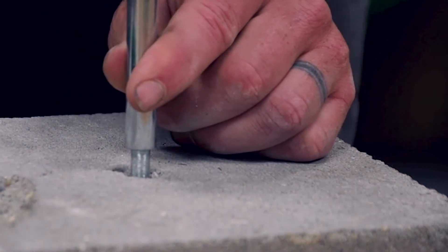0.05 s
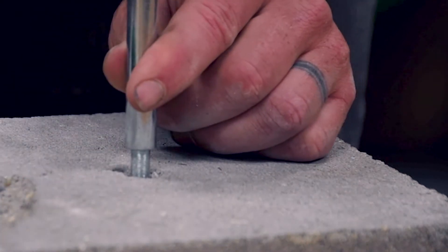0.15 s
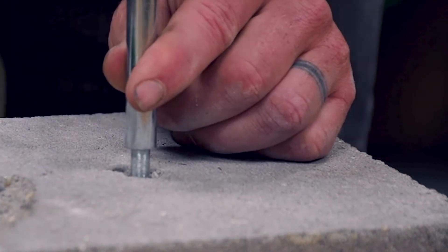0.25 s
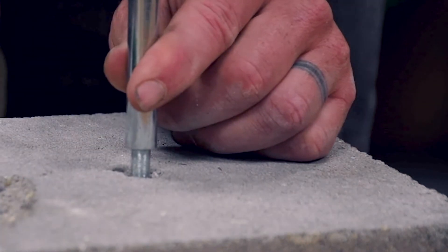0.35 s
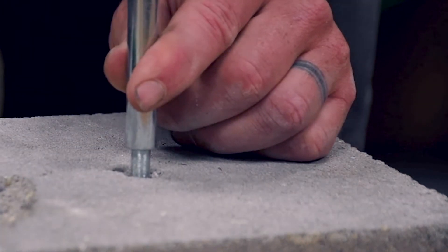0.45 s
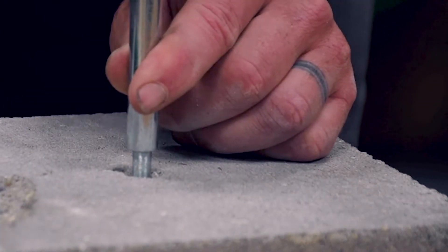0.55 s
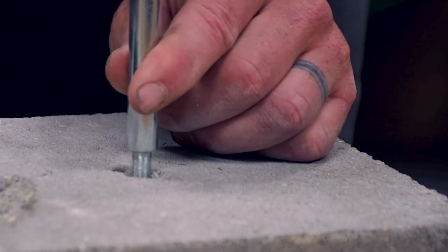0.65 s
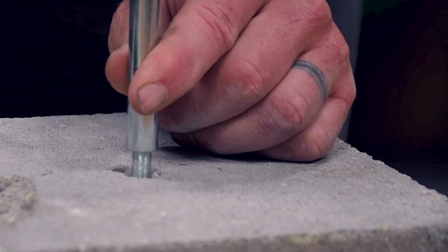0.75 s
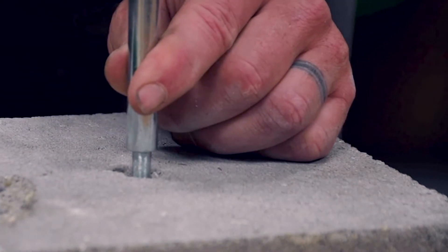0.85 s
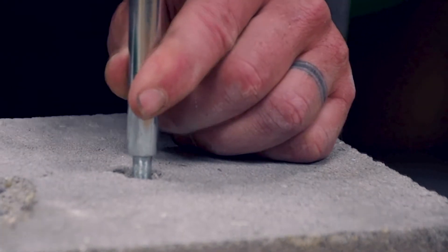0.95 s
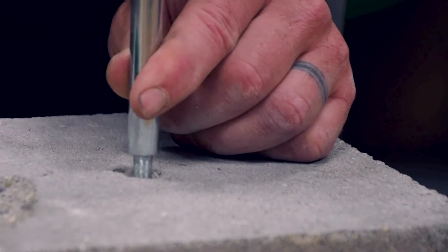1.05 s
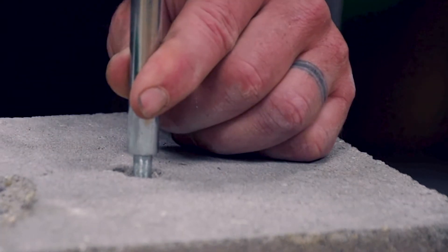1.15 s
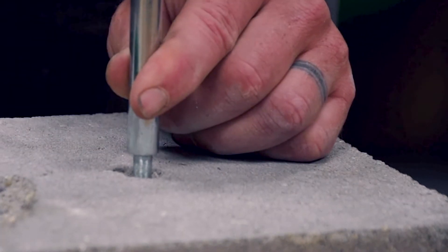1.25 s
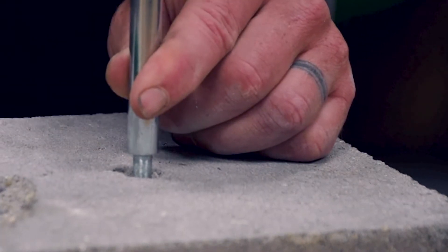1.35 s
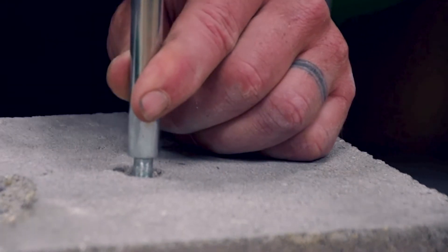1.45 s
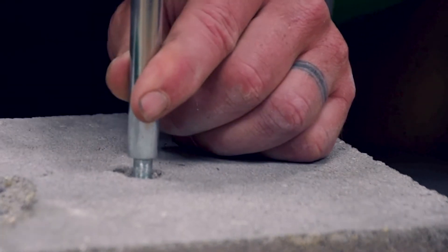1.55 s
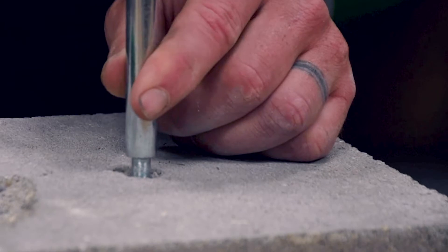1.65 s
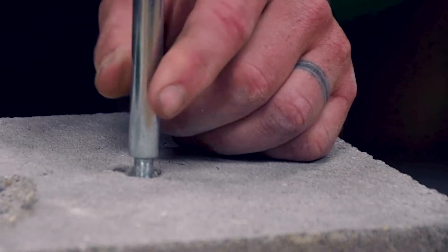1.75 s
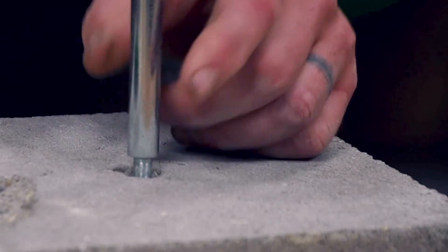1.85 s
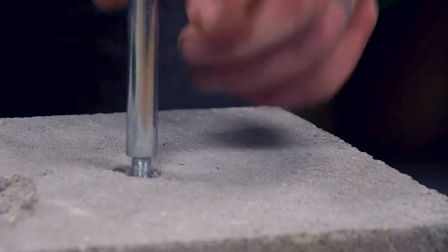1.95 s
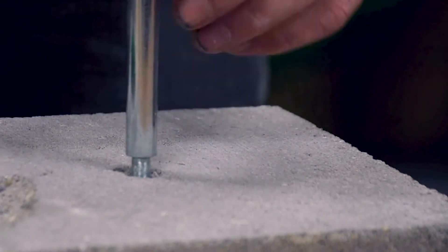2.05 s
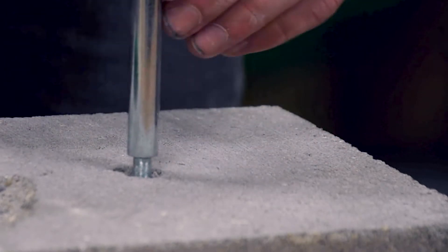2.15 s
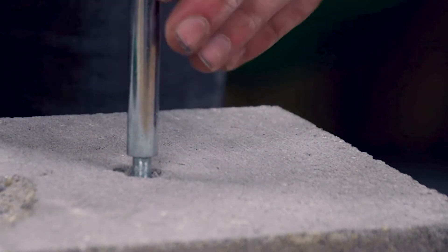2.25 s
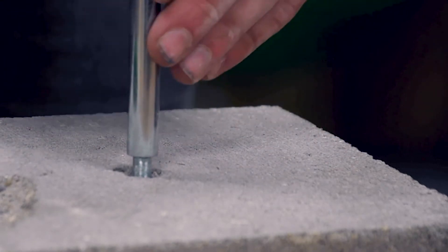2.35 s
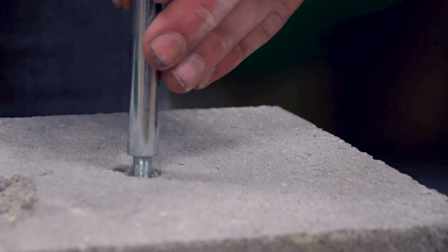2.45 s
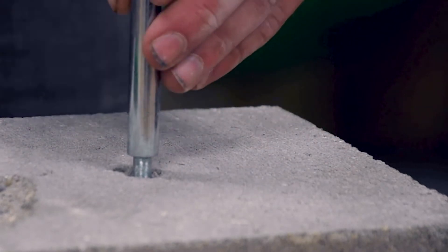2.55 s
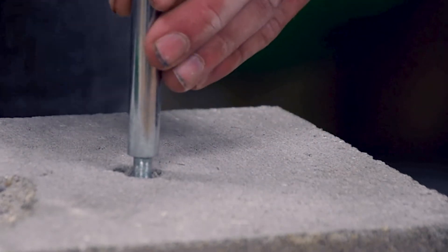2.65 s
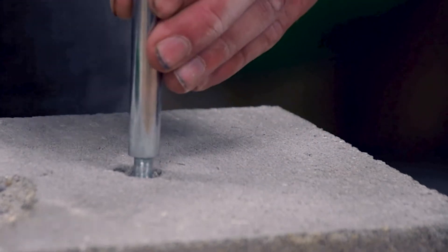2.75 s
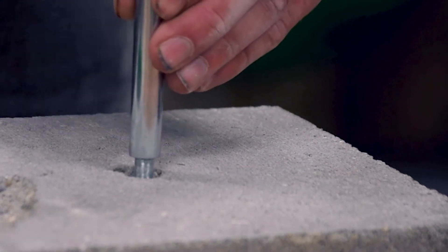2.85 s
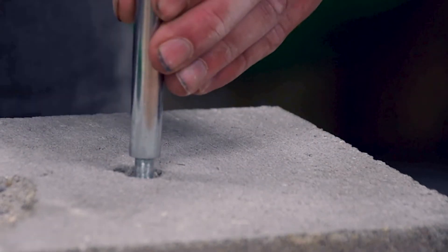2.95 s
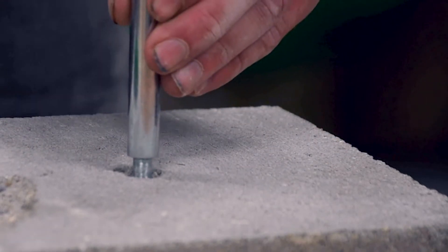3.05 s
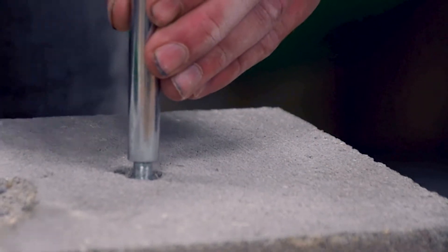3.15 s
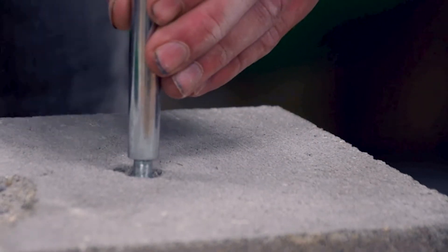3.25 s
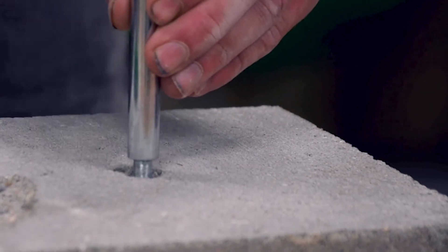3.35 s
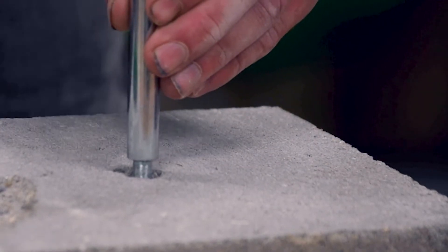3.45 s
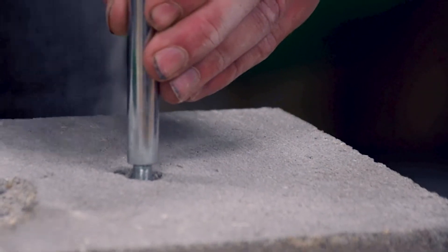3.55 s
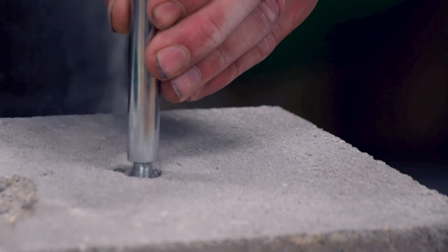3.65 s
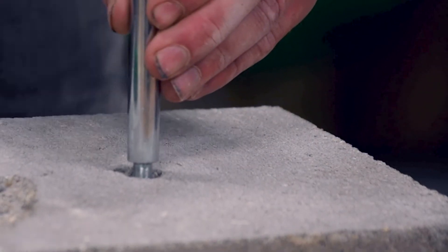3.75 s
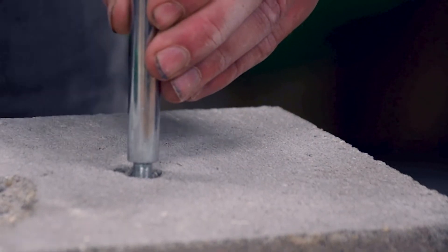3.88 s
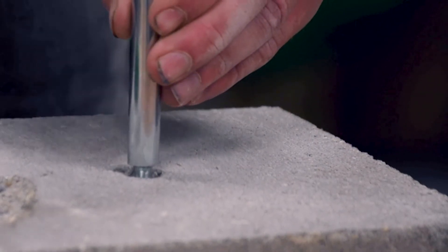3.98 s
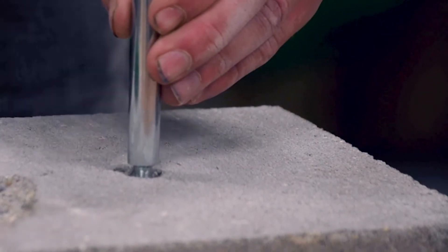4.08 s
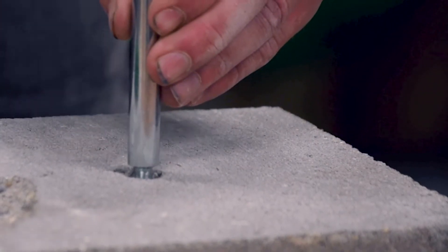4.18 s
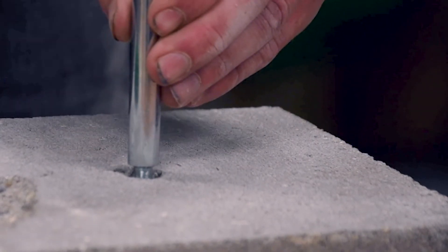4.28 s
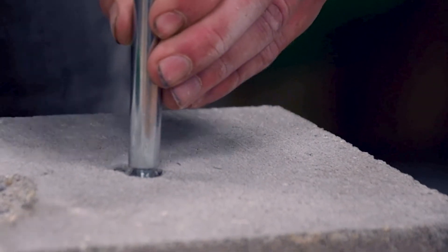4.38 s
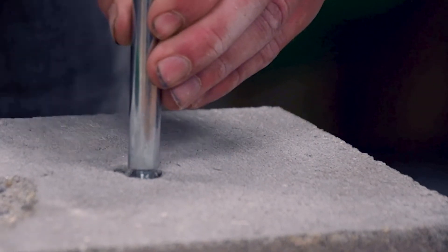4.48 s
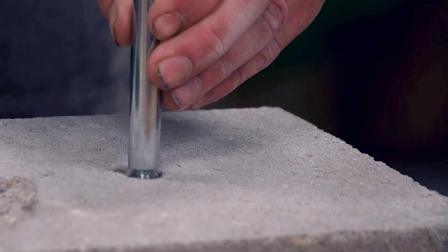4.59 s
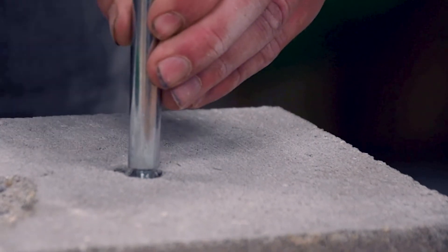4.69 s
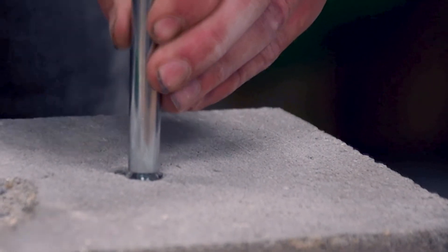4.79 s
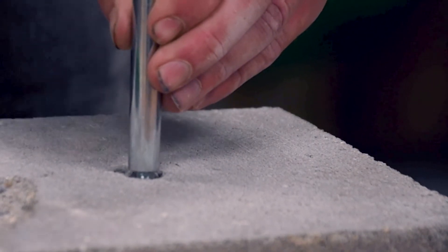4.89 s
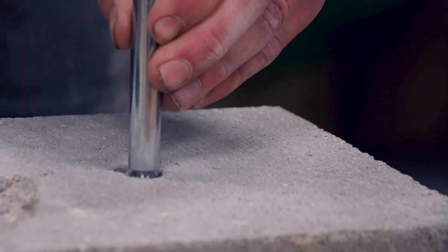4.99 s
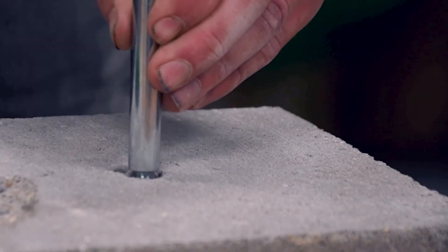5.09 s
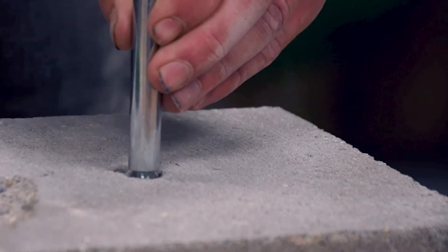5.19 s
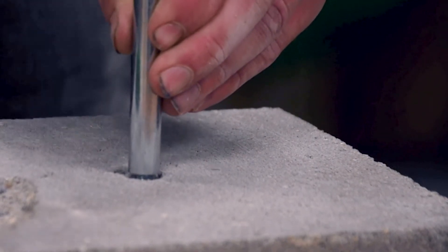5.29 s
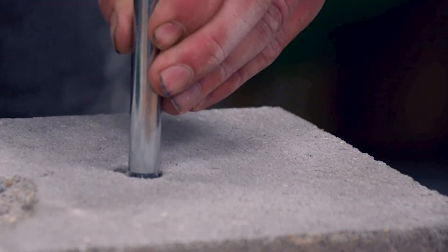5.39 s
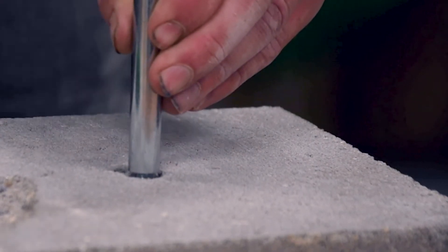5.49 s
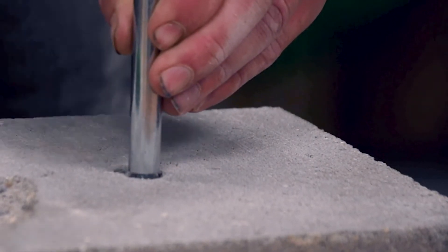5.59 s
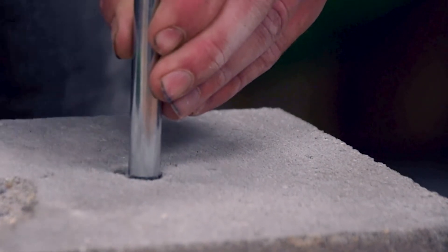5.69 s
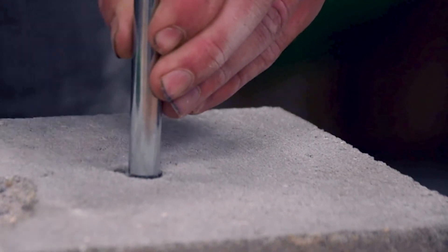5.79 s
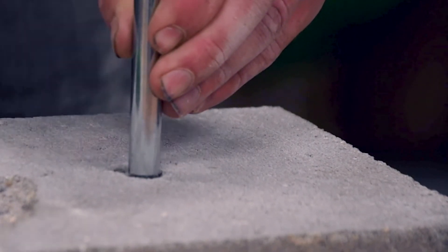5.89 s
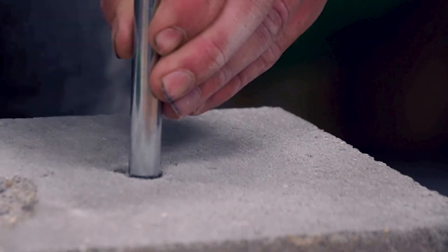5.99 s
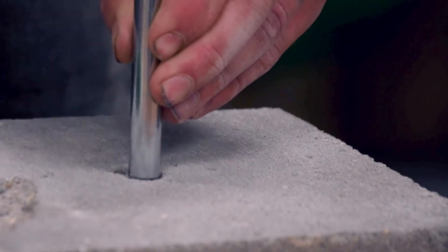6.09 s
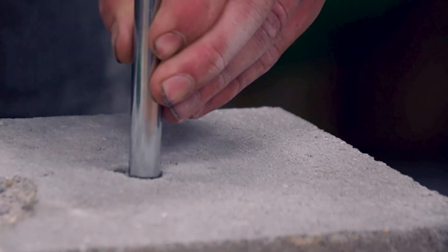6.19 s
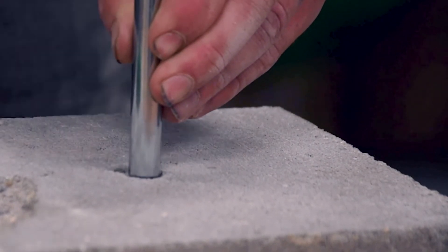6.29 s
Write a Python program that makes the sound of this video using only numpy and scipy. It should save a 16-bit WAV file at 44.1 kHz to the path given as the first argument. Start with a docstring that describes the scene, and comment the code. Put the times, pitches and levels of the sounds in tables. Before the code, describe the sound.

Close stereo pickup in a live workshop: a hammer hits a hand-held steel tool three times, bright clank with a slightly muffled ring. The hand shifts its grip with faint skin rubs and a small tick, then nine more blows follow at about 0.4-second spacing, ringing clearer and thudding heavier as the anchor tightens in the concrete. Short room boom swells behind each hit; a low drone underlies everything.

```python
"""In a live workshop, a hammer drives an anchor into a concrete block through a hand-held steel setting tool.
Three blows, a new grip, then nine more; between them skin rubs and ticks against the tool, over a low drone.
Each blow is a contact spectrum (steel crack, tool modes, block thud) made causal and convolved with the room.
The thud grows and brightens as the anchor tightens; a loosely held tool sings on after the blow.
A fast limiter flattens every blow, so the boom of the room swells up behind the ring."""
import sys
import numpy as np
from scipy import signal
from scipy.fft import rfft, irfft, next_fast_len
from scipy.io import wavfile
from scipy.ndimage import uniform_filter1d, minimum_filter1d

SR = 44100
rng = np.random.default_rng(int(sys.argv[2]) if len(sys.argv) > 2 else 0)


def master(y):
    """Save y as 16-bit WAV."""
    cut = np.clip(np.atleast_2d(y).T, -1, 1)
    pcm = np.round(cut * 32767)  # scale
    wavfile.write(sys.argv[1], SR, pcm.astype(np.int16))


N = 279094

# Hammer blows. Each row: start in seconds, force in dB, bending of the shaft in dB, share of the bending
# in the lower twin mode (0-1), glancing (0-1), upper edge of the blow's treble in Hz.
HAMMER_BLOWS = [(0.5459, -4.5, -6.5, 0.1, 0.37, 12200), (0.9896, -2.5, 2, 0.27, 0.23, 14500),
                (1.4295, 0, 3, .15, 0.23, 14800), (2.7552, -4.5, 3, 0, 0.92, 10400),
                (3.1823, -1.5, -5.5, 0.06, 0.26, 14500), (3.5807, -1.5, 1.5, 1, 0.06, 16000),
                (3.9954, -1.5, 5.5, 0.86, 0.11, 16500), (4.3777, -1.5, -1, 0.55, 0.53, 15000),
                (4.825, -1.5, 0.5, 0.17, 0, 14700), (5.243, -0.9, 0, 0.25, 0.45, 15100),
                (5.6443, -0.5, -0.2, 0.25, 0.4, 15000), (6.0465, -1, -1, 0.14, 0.15, 15900)]
# Main modes of steel tool and hammer head, damped by the hand. Each row: frequency in Hz, half width in Hz.
TOOL_MODES = [(2966, 157), (5068, 99), (5362, 78), (6662, 90), (7960, 370), (8466, 383), (9601, 400),
              (11660, 410)]
# How strongly each main mode speaks. Each row: level in dB while the anchor slides, level in dB once it is
# seated, dB added by a fully glancing blow.
MODE_LEVELS = [(4.5, -8, -1.5), (13.5, 20.5, 1.5), (10, 21.5, 4), (-0.5, 4.5, 19), (16, -10, -14),
               (12, 10.5, -4.5), (0, -0.5, 9.5), (1, -4, 2.5)]
# Rows of TOOL_MODES that are one bending shape in two planes: the lower, the upper.
TWIN_MODES = [1, 2]
# Weak modes, alike in every blow. Each row: frequency in Hz, half width in Hz, level in dB.
WEAK_MODES = [(1880, 110, -4), (3480, 80, -2), (4130, 150, -2), (6050, 300, 1), (12180, 55, 0),
              (13730, 40, -4), (14560, 80, -13)]
# Crack of steel on steel. Each row: frequency in Hz, level in dB.
CRACK_SPECTRUM = [(30, -38), (200, -10.5), (1500, -7.5), (2300, -7.5), (4500, 1.5), (7000, 0), (9500, -5.5),
                  (10500, -7.5), (13000, -3), (15500, -10.5)]
# Thud of the block on its bench. Each row: frequency in Hz, level in dB.
THUD_SPECTRUM = [(20, -19), (50, -18), (85, -13.5), (120, -11), (220, -8), (400, -0.5), (600, -4.5),
                 (1000, -12), (1600, -21.5), (3000, -26), (6000, -49.5), (16000, -76.5)]
# After-ring of the tool between fingertips. Each row: frequency in Hz, level in dB, t60 in seconds.
SINGING_MODES = [(5361, -48, 0.53), (6660, -61, 0.41), (12170, -55, 0.3), (13730, -58, 0.28)]
# Skin sliding on steel and concrete. Each row: height of the stroke in seconds, level in dB, length in seconds.
RUB_STROKES = [(0.13, -62, 0.21), (0.514, -63.5, 0.12), (2.03, -62, .32), (2.494, -68, 0.31)]
# Spectrum of rubbing skin. Each row: frequency in Hz, level in dB.
SKIN_SPECTRUM = [(800, -33), (2200, -10), (4500, 2.5), (6500, -3), (9000, -2), (11000, -24), (15000, -20.5)]
# Light touches of the fingers on the tool. Each row: start in seconds, tick in dB, ring in dB.
FINGER_TOUCHES = [(1.815, -70, -63), (2.378, -68, -62), (2.405, -70, -56), (2.451, -42, -65)]
# Ring of the touched, loosely held tool. Each row: frequency in Hz, level in dB, t60 in seconds.
TOUCH_MODES = [(6000, -6, .3), (7670, 0, .38), (11810, -7, .22)]
# Standing waves of the workshop. Each row: frequency in Hz, level in dB, t60 in seconds.
STANDING_WAVES = [(119.94, 3.5, 0.66), (166.6, 2, 0.52), (182.2, -4, 0.72), (208.2, 0, 0.59),
                  (334.2, -5, 0.73), (380.5, -2.5, 0.65), (501.3, -8, 0.68), (544.5, -5.5, 0.69),
                  (706, -5, 0.57), (794, -2, 0.51)]
# Decay of the echoes. Each row: frequency in Hz, t60 in seconds.
ECHO_DECAY = [(40, 0.43), (150, 0.78), (400, 0.65), (800, 0.53), (1500, 0.45), (3000, 0.4), (5500, 0.36),
              (8000, 0.34), (12000, 0.27), (16000, 0.088)]
# Gathering of the echoes. Each row: frequency in Hz, time constant in seconds.
ECHO_BUILD = [(60, .015), (300, 0.013), (800, 0.022), (2500, 0.013), (8000, 0.0034)]
# Correlation of left and right in the diffuse field. Each row: frequency in Hz, likeness (-1 to 1).
EAR_LIKENESS = [(30, 0.85), (70, 0.99), (150, 0.98), (350, 0.86), (700, 0.59), (1400, 0.29), (2800, -0.23),
                (6000, 0.11), (12000, -0.057)]
# Room tone. Each row: frequency in Hz, relative level in dB.
DRONE_SPECTRUM = [(12, -80), (20, -47.5), (59, -15), (95, -21.5), (109, -16.5), (129, -6), (153, -11),
                  (259, -19.5), (289, -19.5), (534, -26), (581, -25.5), (686, -28.5), (2210, -38.5),
                  (3260, -42.5), (15500, -51.5)]
# Stereo balance. Each row: frequency in Hz, left minus right in dB.
BALANCE = [(100, -0.7), (300, -1.5), (1000, -2), (4000, -1.5), (8000, -1.5), (12000, -3)]

REGRIP_S = 2.2  # the fist around the tool gives way to a fingertip hold
SEATED_S = 4.6  # the anchor reaches the bottom of its hole
WEDGING = 0.36  # tightness, 0 to 1, grows as this power of the share of blows struck
# Each pair: the value on a slack anchor, and what a tight one adds.
THUD_DB, THUD_GAIN_DB = 1.5, 15.5
HARDNESS_DB, HARDNESS_GAIN_DB = -4.5, 7  # slope of the thud, per octave
BRIGHTNESS_DB, BRIGHTNESS_GAIN_DB = -5.5, 5.5  # slope of the crack, per octave above 5 kHz
EDGE_DB, EDGE_WIDTH_HZ = -12.5, 900  # above its treble edge a blow falls this far over this width
GLANCE_PUSH_DB = -12  # what a fully glancing blow loses of its push
BENDING_HZ = 6000  # the modes below this bend the shaft
FIST_CRACK_DB = -2.5  # a closed fist muffles the crack
FIST_DETUNE = 0.012  # spread of the mode shifts under a closed fist, as a share of frequency
UNEVEN_FIST_DB, UNEVEN_LOOSE_DB = 2.2, 1.4  # random ripple of the crack's spectrum under each grip
RUB_EDGE_DB = -10.5  # the two ends of a stroke lie this far under its height
CEILING_DB, TOP_HZ = -9.7, 15800  # limiter ceiling, and the band limit after it


def hammer(level_db=28, push_db=-40, sing_db=-1):
    """Excitation and response: each blow wedges the anchor tighter, pushes the block and sounds in the room."""
    out = np.zeros((2, N))
    tightness = np.linspace(0, 1, len(HAMMER_BLOWS)) ** WEDGING
    for (s, force_db, bend_db, lower_share, glance, edge_hz), tight in zip(HAMMER_BLOWS, tightness):
        loose = s > REGRIP_S
        blow_db = level_db + force_db
        mode_dbs = tool_levels(s > SEATED_S, bend_db, lower_share, glance)
        thud_db = THUD_DB + THUD_GAIN_DB * tight
        hardness_db = HARDNESS_DB + HARDNESS_GAIN_DB * tight
        brightness_db = BRIGHTNESS_DB + BRIGHTNESS_GAIN_DB * tight
        contact = blow(thud_db, hardness_db, brightness_db, mode_dbs, loose, edge_hz)
        add(out, s, amp(blow_db) * signal.fftconvolve(contact[None], workshop(), axes=1))
        # a glancing blow drives the block down less
        add(out, s, amp(blow_db + push_db + GLANCE_PUSH_DB * glance ** 2) * push())
        if loose:
            add(out, s, amp(blow_db + sing_db) * sing(lower_share, edge_hz))
    return out


def blow(thud_db, hardness_db, brightness_db, mode_dbs, loose, edge_hz, ring_db=0, overtone_db=-2, size=8192):
    """Addition of powers: one contact sums the crack of steel, the tool's modes and the thud of the block."""
    hz = np.fft.rfftfreq(size, 1 / SR)
    # the hammer lands a little differently each time and favours other small resonances
    ripple = uniform_filter1d(rng.standard_normal(len(hz)), size=24)
    ripple = unit(uniform_filter1d(ripple, size=16))
    uneven_db = UNEVEN_LOOSE_DB if loose else UNEVEN_FIST_DB
    steel = amp(along(CRACK_SPECTRUM, hz) + uneven_db * ripple) ** 2
    steel += sum(amp(db + overtone_db) ** 2 * resonance(hz, f, width) for f, width, db in WEAK_MODES)
    octaves_up = np.log2(np.maximum(hz / 5000, 1))
    steel *= amp(brightness_db * octaves_up + (0 if loose else FIST_CRACK_DB)) ** 2
    ring = amp(ring_db) ** 2 * tool_power(hz, mode_dbs, loose)
    # a tighter anchor stops the tool sooner, which makes the thud brighter
    slope_db = hardness_db * np.log2(np.maximum(hz, 130) / 400)
    thud = amp(thud_db + along(THUD_SPECTRUM, hz) + slope_db) ** 2
    return causal(treble_edge(hz, edge_hz) * np.sqrt(steel + ring + thud))


def tool_levels(seated, bend_db, lower_share, glance):
    """Modal excitation: the seat of the anchor and the way the hammer lands set the dB of each main mode."""
    sliding_db, seated_db, glance_db = np.transpose(MODE_LEVELS)
    bends = np.transpose(TOOL_MODES)[0] < BENDING_HZ
    dbs = (seated_db if seated else sliding_db) + glance * glance_db + bend_db * bends
    share = np.clip(lower_share, 0.001, 0.999)
    dbs[TWIN_MODES] += 10 * np.log10([share, 1 - share])
    return dbs


def tool_power(hz, mode_dbs, loose, fist_hz=120):
    """Damping of modes: fingertips leave them sharp, a fist widens them and shifts them from blow to blow."""
    power = 0
    shifts = np.ones(len(TOOL_MODES)) if loose else 1 + FIST_DETUNE * rng.standard_normal(len(TOOL_MODES))
    for (f, width), db, shift in zip(TOOL_MODES, mode_dbs, shifts):
        if loose:
            mode = resonance(hz, f, width)
        else:
            mode = resonance(hz, f * shift, np.hypot(width, fist_hz), core=0)
        power = power + amp(db) ** 2 * mode
    return power


def resonance(hz, centre, width, core=0.98, sharpness=6):
    """Resonance: a broad peak for the hammer pressing on the tool, a sharp core for the ring after it lifts."""
    offset = (hz - centre) / width
    return 1 / (1 + offset ** 2) ** 2 + core / (1 + (offset * sharpness) ** 2) ** 2


def treble_edge(hz, edge_hz):
    """Treble edge: above it, a blow is duller by a set step."""
    return amp(np.interp(hz, [edge_hz, edge_hz + EDGE_WIDTH_HZ], [0, EDGE_DB]))


def causal(gain):
    """Minimum phase: folding the cepstrum gives the promptest impulse response with this spectrum."""
    cepstrum = irfft(np.log(np.maximum(gain, 1e-6)))
    half = len(cepstrum) // 2
    fold = np.r_[1, np.full(half - 1, 2), 1, np.zeros(half - 1)]
    return irfft(np.exp(rfft(cepstrum * fold)))


def push():
    """Damped oscillation: the block sinks and springs back in about one low cycle."""
    t = np.arange(SR // 10) / SR
    return np.sin(2 * np.pi * 115 * t) * t / 0.0036 * np.exp(1 - t / 0.0036)


def sing(lower_share, edge_hz, across_db=-9):
    """Free vibration: the loose tool's clean after-ring, its bending tone weak for a swing in the other plane."""
    t = np.arange(SR * 3 // 4) / SR
    out = np.zeros((2, len(t)))
    for f, db, t60 in SINGING_MODES:
        across = across_db * lower_share * (f < BENDING_HZ)
        db = db + across + rng.normal(0, 2.2, (2, 1))
        turns = rng.random((2, 1)) / 2  # each channel hears it at its own phase
        out += treble_edge(f, edge_hz) * amp(db - 60 * t / t60) * np.sin(2 * np.pi * (f * t + turns))
    return out


def fingers(tick_s=0.002, swell_s=0.028):
    """Friction and light impact: skin rubs along the tool, and touches tick against it and set it tingling."""
    t = np.arange(N) / SR
    strokes = sum(amp(db + RUB_EDGE_DB * np.abs(2 * (t - s) / length)) for s, db, length in RUB_STROKES)
    out = skin(N) * strokes
    t = np.arange(SR // 2) / SR
    for s, tick_db, ring_db in FINGER_TOUCHES:
        ring = sum(amp(ring_db + db - 60 * t / t60) * np.sin(2 * np.pi * (f * t + rng.random()))
                   for f, db, t60 in TOUCH_MODES)
        # sliding skin damps the ring unevenly
        ring = ring * amp(3 * unit(uniform_filter1d(rng.standard_normal(len(t)), size=400)))
        tick = amp(tick_db) * np.exp(-t / tick_s) * skin(len(t))
        add(out, s, tick + ring * (1 - np.exp(-t / swell_s)))
    return out


def skin(size):
    """Friction noise: diffuse noise shaped by the spectrum of rubbing skin."""
    return unit(filtered(diffuse(size), lambda hz: amp(along(SKIN_SPECTRUM, hz))))


def workshop(direct_db=-13, near_db=-7, near_s=0.011, near_hz=1200, standing_db=-50):
    """Room impulse response: direct sound, near scatter, gathering echoes and standing waves, in stereo."""
    size = SR * 3 // 4
    t = np.arange(size) / SR
    hz, age, z = signal.stft(diffuse(size), SR, nperseg=256)
    build = 1 - np.exp(-(age + 0.0049) / along(ECHO_BUILD, hz)[:, None])
    fade = amp(-60 * age / along(ECHO_DECAY, hz)[:, None])
    echoes = signal.istft(z * build * fade, SR)[1][:, :size]
    # block, bench and hands throw back the short waves within milliseconds
    near = signal.lfilter(*signal.butter(2, near_hz, "high", fs=SR), rng.standard_normal((2, size)))
    near = near * np.exp(-t / near_s)
    standing = sum(amp(db - 60 * t / t60) * np.sin(2 * np.pi * (f * t + rng.random()))
                   for f, db, t60 in STANDING_WAVES)
    response = echoes / np.linalg.norm(echoes[0]) + amp(near_db) * near / np.linalg.norm(near[0])
    response += amp(standing_db) * standing * (1 - np.exp(-t / 0.006))
    # the small tool radiates little bass straight to the microphone
    direct = signal.lfilter(*signal.butter(1, 500, "high", fs=SR), t == 0)
    return response + amp(direct_db) * direct


def diffuse(size):
    """Diffuse field: stereo noise whose left-right likeness is high in the bass and low in the treble."""
    def mid_side(hz):
        turn = np.arccos(np.clip(along(EAR_LIKENESS, hz), -1, 1)) / 2
        return np.array([np.cos(turn), np.sin(turn)])
    mid, side = filtered(rng.standard_normal((2, size)), mid_side)
    return np.array([mid + side, mid - side])


def room_tone(level_db=-50):
    """Stationary noise: the low steady drone of the workshop."""
    return amp(level_db) * unit(filtered(diffuse(N), lambda hz: amp(along(DRONE_SPECTRUM, hz))))


def amp(db):
    """Level: decibels to an amplitude ratio."""
    return 10 ** (np.asarray(db) / 20)


def unit(x):
    """Effective value: scales a signal to an RMS of one."""
    return x / np.sqrt(np.mean(x ** 2) + 1e-20)


def along(points, hz):
    """Logarithmic pitch: interpolates (Hz, value) points on a log frequency axis."""
    f, v = np.transpose(points)
    return np.interp(np.log(hz + 1), np.log(f + 1), v)


def filtered(x, response):
    """Linear filtering: multiplies the spectrum of x by a response of frequency."""
    n = x.shape[-1]
    m = next_fast_len(n + SR // 4)
    return irfft(rfft(x, m) * response(np.fft.rfftfreq(m, 1 / SR)), m)[..., :n]


def add(track, s, sound):
    """Superposition: mixes a sound into the track from s seconds on."""
    part = track[..., round(s * SR):][..., :sound.shape[-1]]
    part += sound[..., :part.shape[-1]]


def scene():
    """Interaural level difference: blows, hand and room tone, all a little to the right."""
    mix = hammer() + fingers() + room_tone()
    return filtered(mix, lambda hz: amp(along(BALANCE, hz) * [[0.5], [-0.5]]))


def limiter(x, threshold_db=-7.0, attack_s=0.0024, hold_s=0.0044):
    """Gain control: both channels turn down together; the first instant slips through and is rounded off."""
    size = max(1, round(hold_s * SR))
    # highest peak of the last few milliseconds
    peak = -minimum_filter1d(-np.abs(x).max(axis=0), size, origin=(size - 1) // 2)
    step = 1 - np.exp(-1 / (attack_s * SR))
    level = signal.lfilter([step], [1, step - 1], peak)
    held = x / np.maximum(1, level / amp(threshold_db))
    return held / (1 + (held / amp(CEILING_DB)) ** 10) ** (1 / 10)


def record(dry):
    """Dynamic and spectral limits: a fast limiter, then a steep low-pass."""
    return filtered(limiter(dry), lambda hz: 1 / np.sqrt(1 + (hz / TOP_HZ) ** 160))


dry = scene()
out = record(dry)
master(out)
```